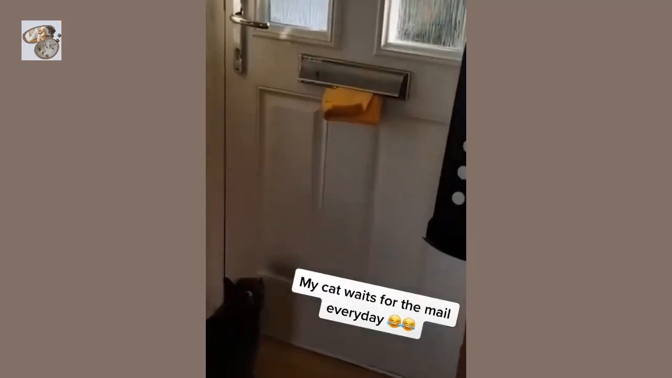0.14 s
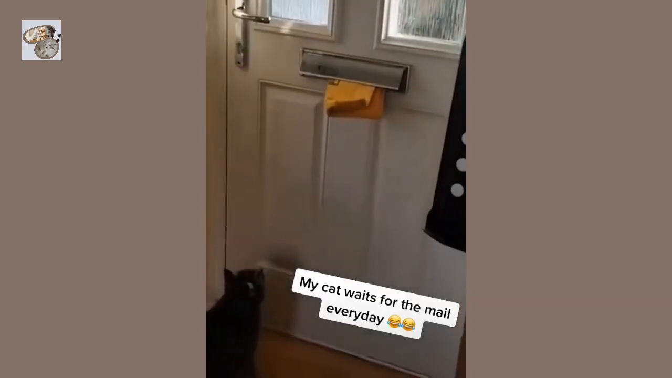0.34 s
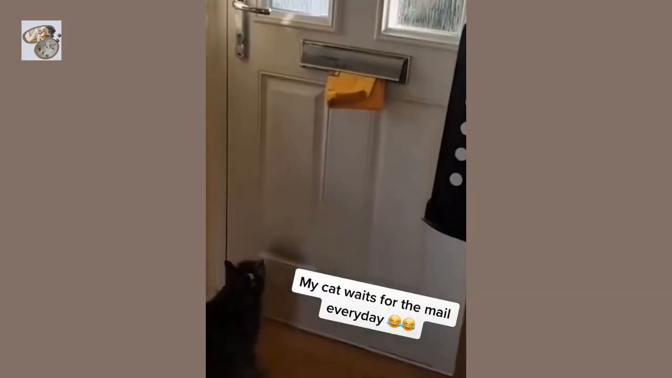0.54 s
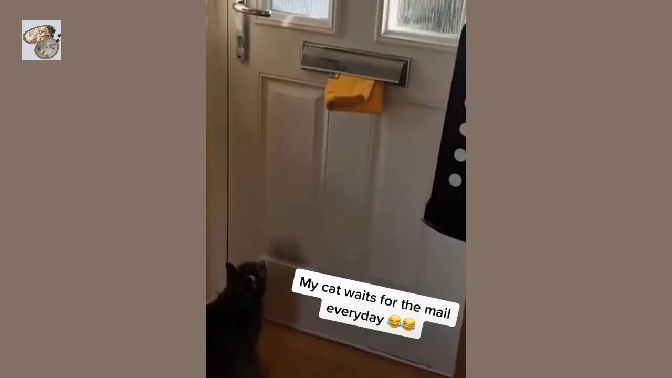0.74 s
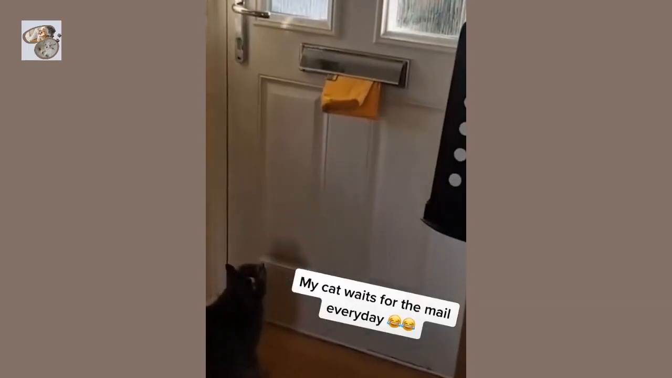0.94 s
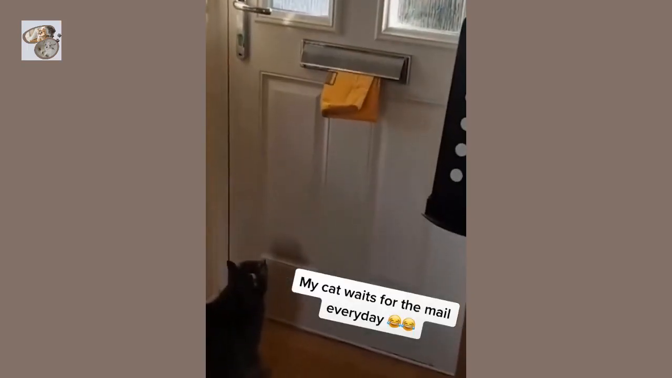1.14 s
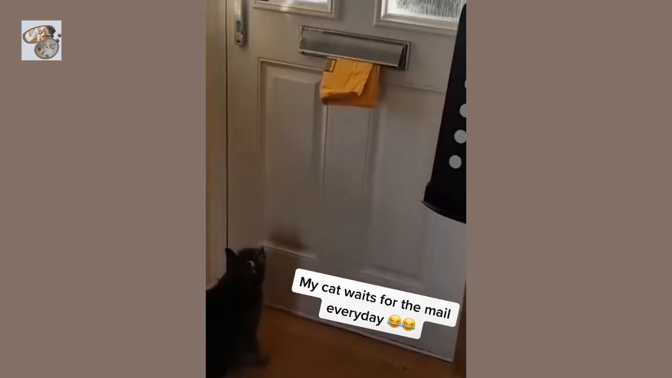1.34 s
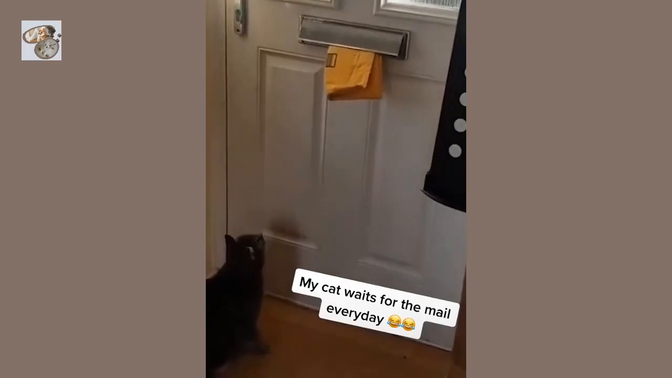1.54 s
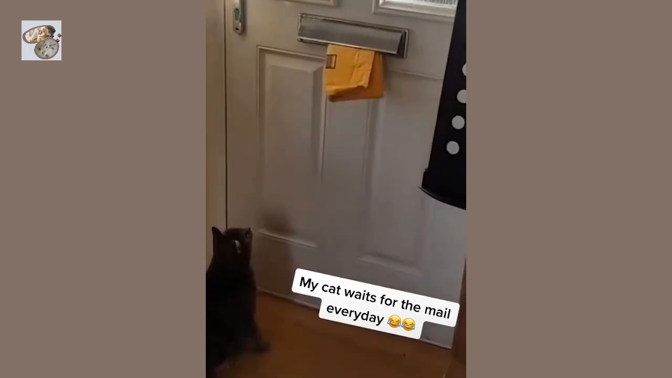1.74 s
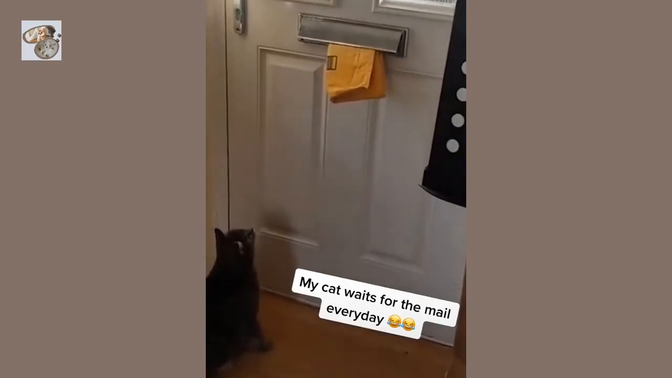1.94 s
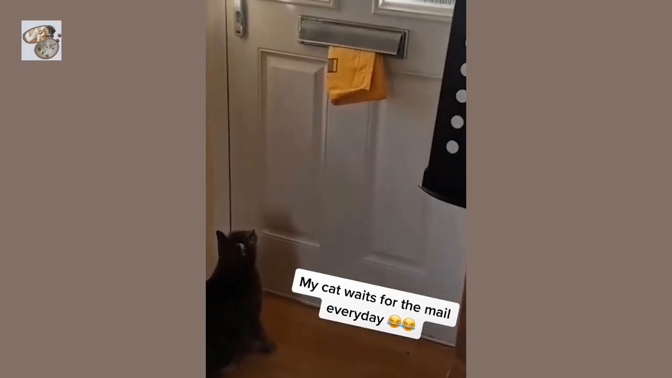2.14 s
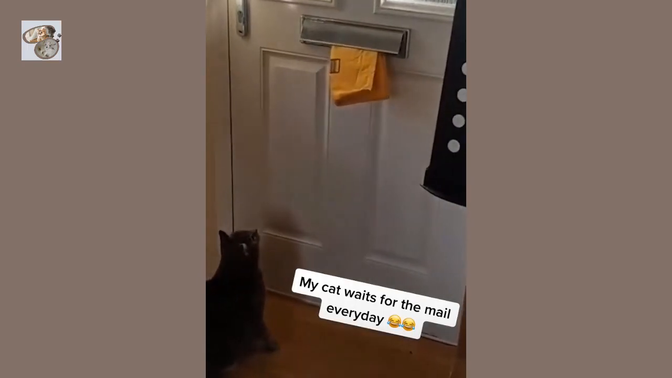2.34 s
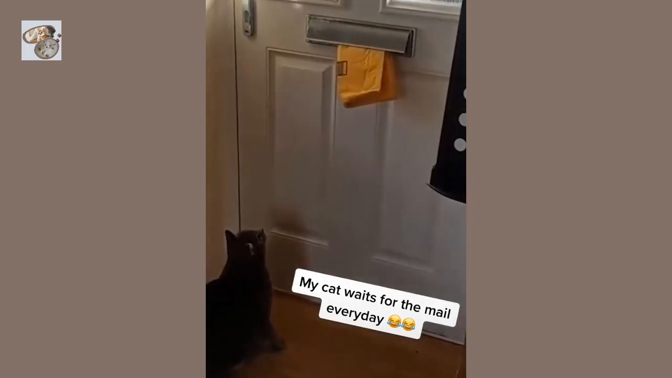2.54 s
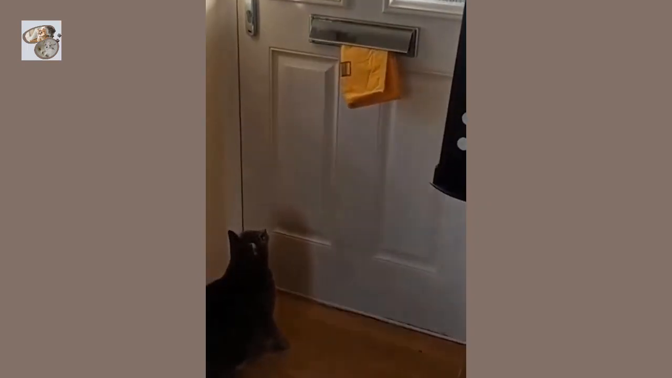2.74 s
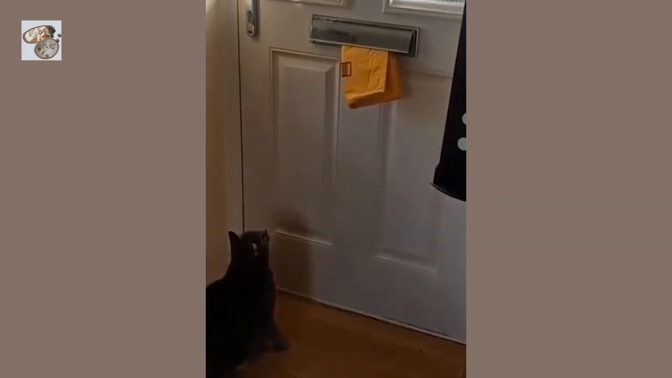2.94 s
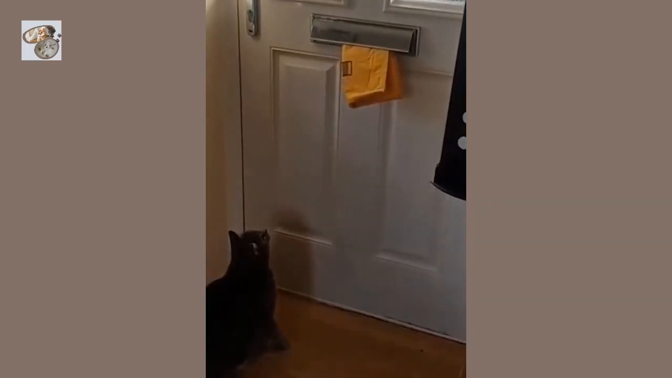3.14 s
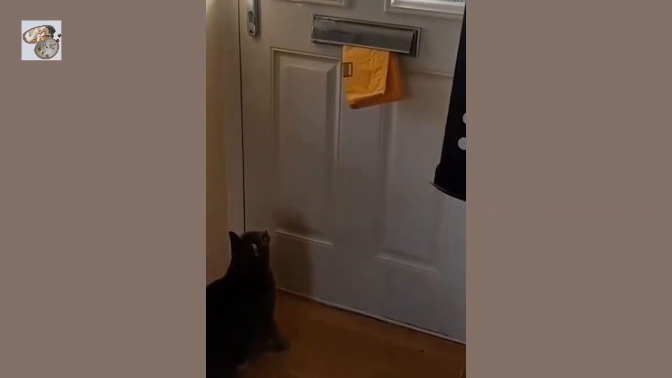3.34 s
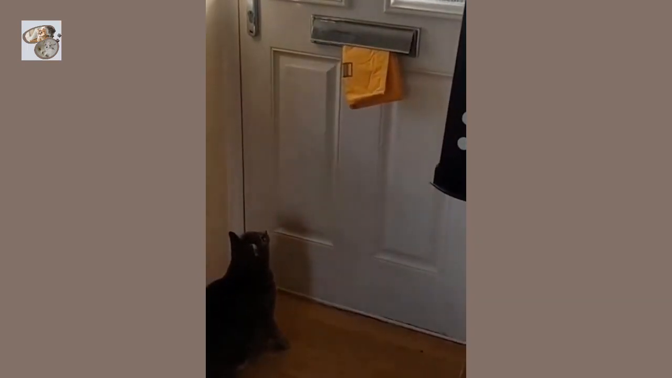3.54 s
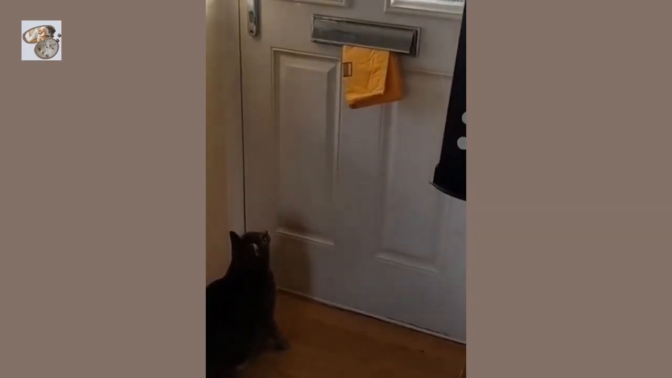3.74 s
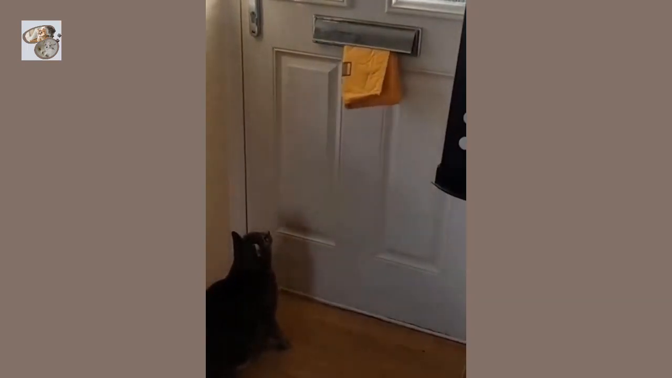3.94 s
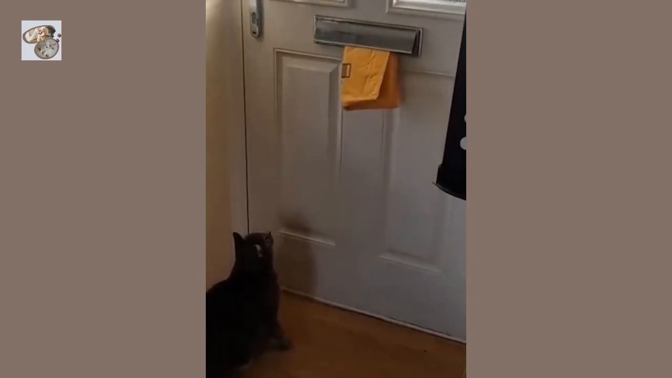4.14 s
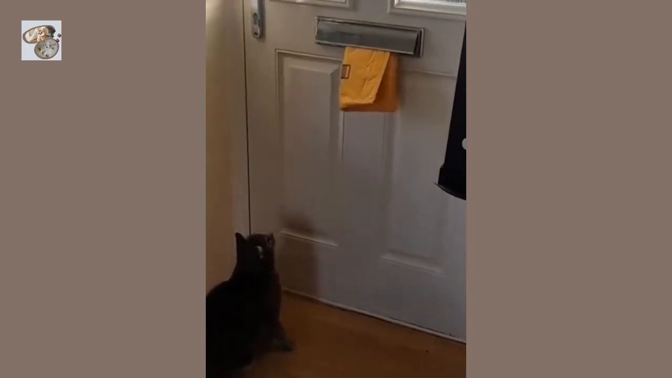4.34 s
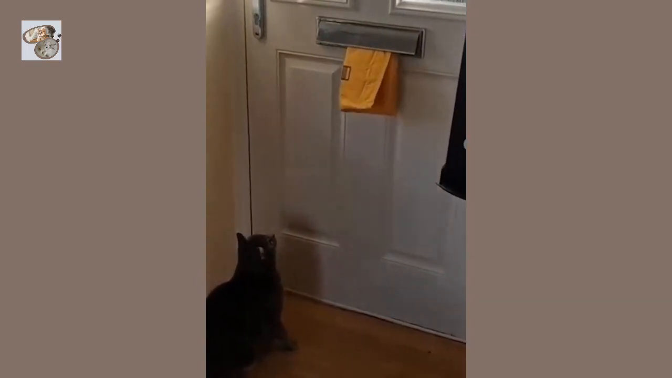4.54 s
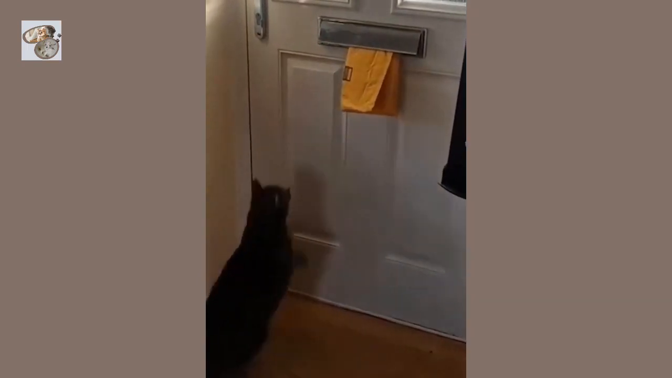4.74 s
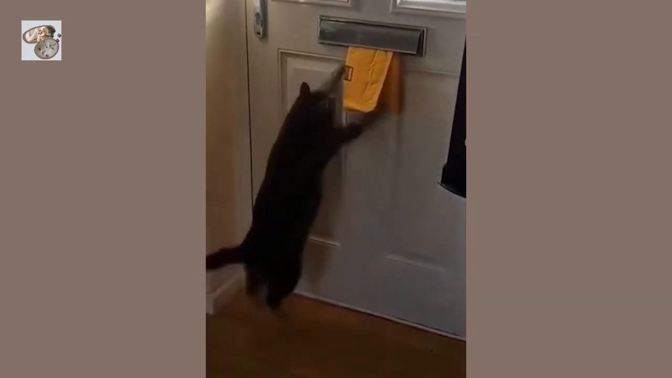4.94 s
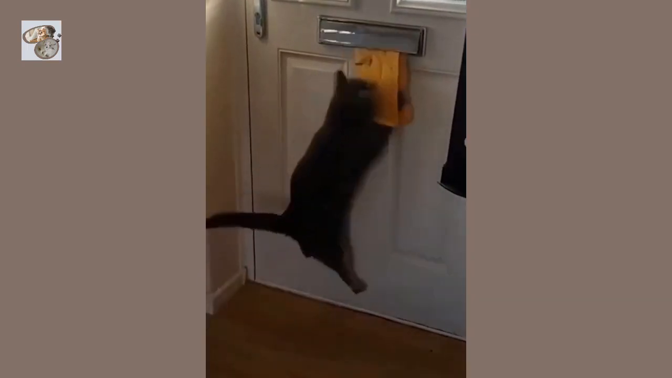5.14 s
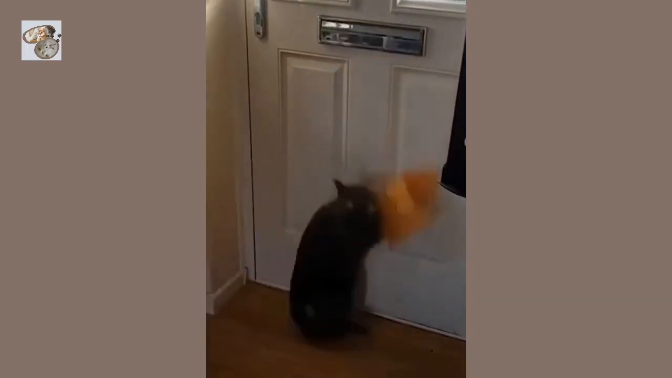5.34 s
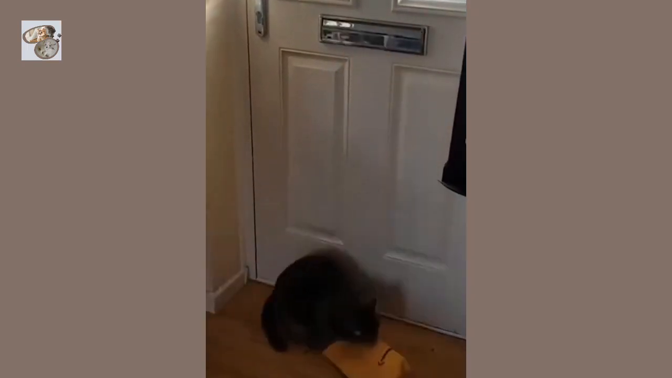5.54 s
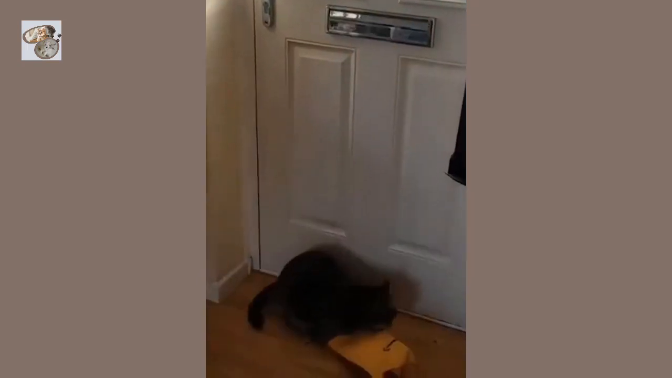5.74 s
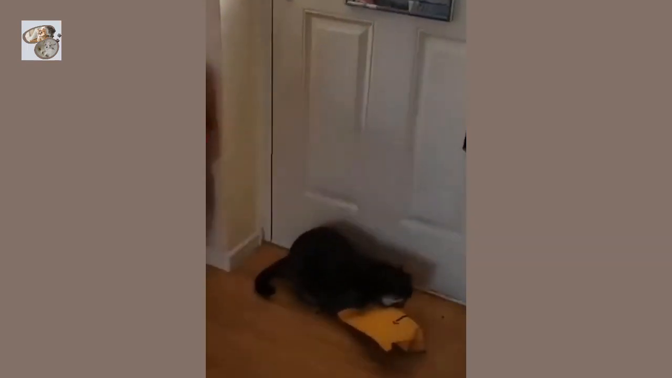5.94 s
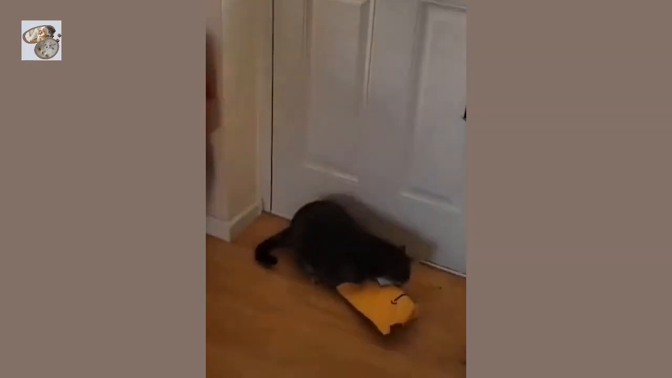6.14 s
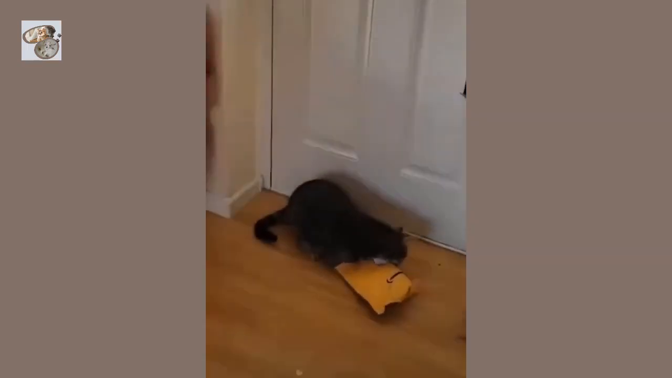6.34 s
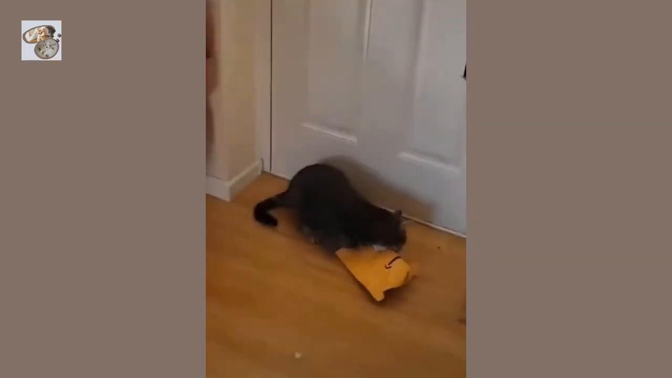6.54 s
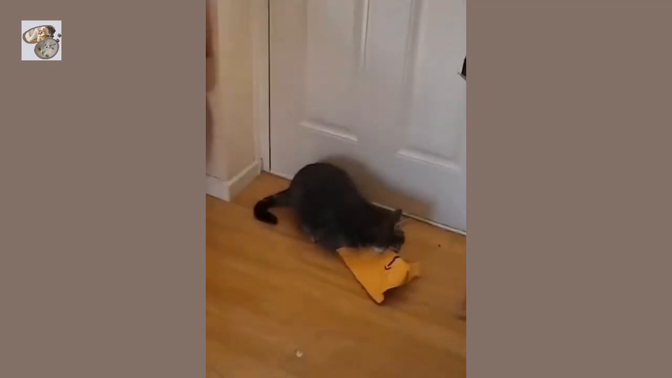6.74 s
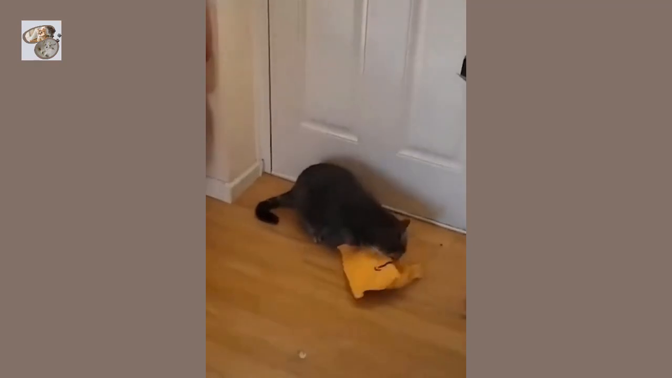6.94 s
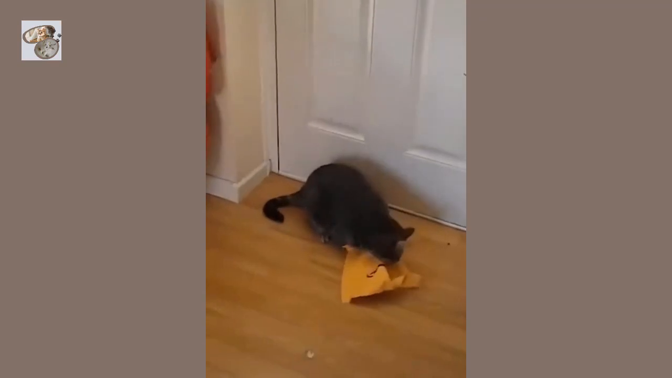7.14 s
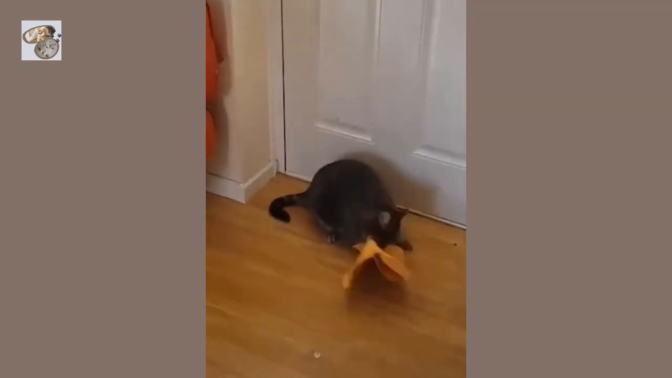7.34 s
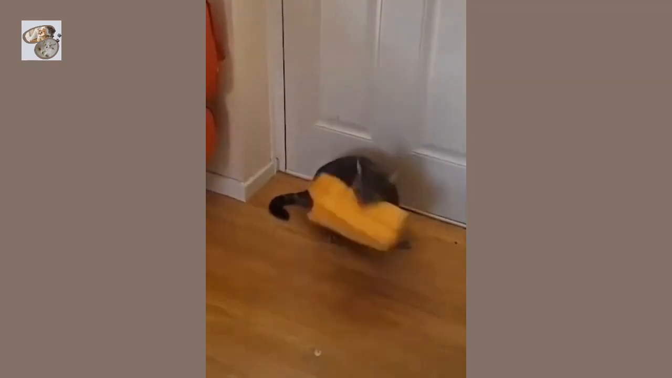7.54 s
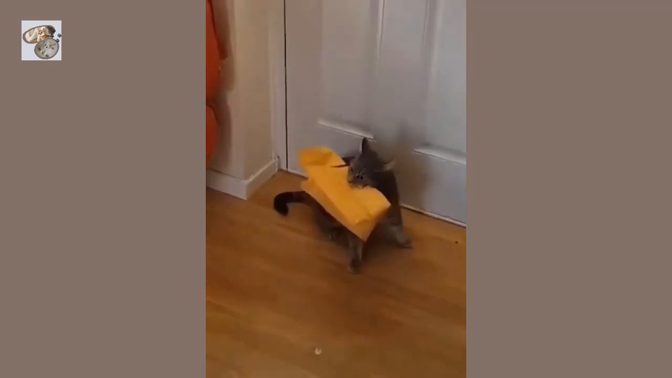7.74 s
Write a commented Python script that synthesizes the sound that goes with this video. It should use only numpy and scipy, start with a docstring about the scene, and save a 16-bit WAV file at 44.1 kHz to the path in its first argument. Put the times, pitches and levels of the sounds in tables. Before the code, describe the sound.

Close in a small hard-floored hall, a padded envelope is pushed through a metal letterbox with soft rustles, a sharp early knock and scattered snaps, while an engine drones low outside. The rubbing thins to near quiet, then a cat rips the envelope free, the flap clacks, and both hit the floor with loud thumps. Crisp paper crackles and small paw taps follow, ending in a sharp snap.

```python
"""A hard-floored hall, close to the front door. First traffic drones faintly behind the door and a second hum
passes, while a padded envelope is worked through the metal letterbox: rustling strokes, snaps and knocks.
Then a cat leaps, drags the envelope out and lands with it; lastly it paws and bites it on the floor.
Rumble and rustle are filtered noise, engines are wavering sines, snaps are noise and a short ring,
thumps ring the modes of the boards, and the hall is a tail of sparse taps."""
import sys
import numpy as np
from scipy import signal
from scipy.fft import rfft, irfft, next_fast_len
from scipy.io import wavfile
from scipy.ndimage import uniform_filter1d

SR = 44100
rng = np.random.default_rng(int(sys.argv[2]) if len(sys.argv) > 2 else 0)


def wav_record(signal):
    """Record a signal, one row per channel, as 16-bit PCM in the file named by sys.argv[1]."""
    frames = np.transpose(np.atleast_2d(signal))
    bounded = np.clip(frames, -1, 1)
    # unit amplitude maps onto the largest positive 16-bit level
    quanta = np.round(bounded * 32767).astype(np.int16)
    wavfile.write(sys.argv[1], SR, quanta)


N = 344421


def gain_of(db):
    """Turns dB into an amplitude factor."""
    return 10 ** (np.asarray(db) / 20)


def evened(x):
    """Scales each channel to an RMS of 1."""
    return x / np.sqrt(np.mean(x ** 2, axis=-1, keepdims=True) + 1e-20)


def read(points, hz):
    """Reads a curve over frequency, straight on a log axis between its points."""
    f, value = np.transpose(points)
    return np.interp(np.log(hz + 1), np.log(f + 1), value)


def follow(rows):
    """Every column of a timed table, sample by sample; the ends are held."""
    s, *columns = np.transpose(rows)
    return [np.interp(np.arange(N) / SR, s, c) for c in columns]


def colour(x, points):
    """Filters a sound by a spectrum in dB."""
    size = next_fast_len(N)
    gain = gain_of(read(points, np.fft.rfftfreq(size, 1 / SR)))
    return irfft(rfft(x, size) * gain, size)[..., :N]


def add(mix, s, sound):
    """Lays a sound into the mix at s seconds, cut at the end."""
    part = mix[round(s * SR):][:len(sound)]
    part += sound[:len(part)]


# rumble of street and house: time_s, level_db
RUMBLE_LEVEL = [(0.0, -58), (1.5, -62), (2.1, -63), (2.9, -66), (3.8, -64), (5.0, -68.5), (5.4, -60),
                (6.15, -61), (6.4, -68), (6.7, -63.5), (7.81, -59)]
# relative spectrum of that rumble: freq_hz, density_db (per Hz)
RUMBLE_SPECTRUM = [(12, -54), (20, -21), (32, 6), (50, -5.5), (65, 3.5), (102, -1.5), (151, -6),
                   (182, -10.5), (500, -22), (650, -76), (1100, -120)]


def background():
    """Low rumble of street and house: coloured stereo noise that swells and sinks."""
    level = gain_of(follow(RUMBLE_LEVEL)[0])
    noise = rng.standard_normal((2, N))
    return level * evened(colour(noise, RUMBLE_SPECTRUM))


# an engine outside the door: time_s, firing_hz, level_db, octave_level_db
ENGINE_OUTSIDE = [(0.0, 75, -69, -58.5), (0.3, 77.9, -73, -66), (0.75, 81.5, -65, -74),
                  (0.95, 80.8, -61, -80), (1.1, 83, -55, -67), (1.28, 86, -61, -51), (1.45, 87, -66.5, -53),
                  (1.52, 87.5, -70, -61), (1.6, 88, -65, -50.5), (1.72, 88.6, -67, -58.5),
                  (1.84, 89.5, -65.5, -72), (2.15, 91.05, -74, -73.5), (2.3, 89, -73, -63.5),
                  (2.6, 79, -64.5, -76), (2.95, 66.5, -64, -64), (3.3, 64.5, -65, -78.5),
                  (3.75, 68.5, -70, -70), (3.92, 69.4, -66, -67.5), (4.15, 72.2, -57.5, -64.5),
                  (4.3, 74.7, -65, -82), (4.72, 75.8, -68, -74), (5.3, 77.8, -78, -68)]
# a second, passing hum: time_s, pitch_hz, level_db
PASSING_HUM = [(0.3, 105.5, -71), (0.6, 106.3, -58.5), (0.85, 98, -75)]


def drone(rows):
    """Slightly unsteady harmonics that fade over 0.11 s beyond the first and last row of their table."""
    hz, *levels = follow(rows)
    waver = evened(uniform_filter1d(rng.standard_normal(N), size=2000))
    t = np.arange(N) / SR
    inside = np.minimum(rows[-1][0] - t, t - rows[0][0])
    fade = np.clip(inside / 0.11 + 1, 0, 1)
    turns = np.cumsum(hz * (1 + 0.0093 * waver)) / SR
    harmonics = sum(gain_of(db) * np.sin(2 * np.pi * k * turns) for k, db in enumerate(levels, 1))
    return np.sqrt(2) * fade * harmonics  # levels are RMS


# how long the hall rings: freq_hz, t60_s
HALL_DECAY = [(100, 0.28), (400, 0.37), (1500, 0.49), (4000, 0.14), (9000, 0.32)]


def hall(x):
    """Two unrelated tails of sparse taps, one for mid and one for side; each pitch dies at its own rate."""
    taps = np.zeros((2, SR // 2))
    at = np.arange(100, SR // 2 - 20, 20) + rng.integers(0, 20, (2, (SR // 2 - 101) // 20))
    np.put_along_axis(taps, at, rng.choice([-1., 1.], at.shape), 1)
    hz, t, z = signal.stft(taps, SR, nperseg=512)
    decay = gain_of(-60 * t / read(HALL_DECAY, hz)[:, None])
    tail = signal.istft(z * decay, SR, nperseg=512)[1]
    tail = tail / np.linalg.norm(tail[0])
    return signal.fftconvolve(x[None], tail, axes=1)[:, :N]


# door and floor boards: mode_hz, level_db (before the blow favours some modes), t60_s (times ring_factor)
BOARD_MODES = [(70.6, -10, 0.17), (91, -2.5, 0.09), (155.7, -1.5, 0.2), (207.5, 6.5, 0.099),
               (273.4, -0.5, 0.11), (337, -6.5, 0.4), (473, -4, 0.24), (610, -42, 0.326), (766, 3, 0.33)]
# paws, body and parcel striking door and floor:
# start_s, peak_db, blow_hz (pitch best driven), ring_factor (on the t60 of the boards)
BLOWS = [(.131, -29.5, 141, 0.4), (.168, -36, 171, 0.86), (3.544, -48, 412, 0.44), (3.831, -49, 375, 0.37),
         (5.396, -33, 78, 0.65), (5.432, -24, 202, 0.81), (5.454, -19, 73, 0.32), (5.501, -30, 70.4, 0.82),
         (5.54, -29, 65, 1.1), (5.584, -16, 130, 0.65), (5.6, -7.5, 207, 0.62), (5.612, -14.5, 70, 1.05),
         (5.619, -10.5, 203, 0.61), (5.643, -17, 146, 0.99), (5.691, -14, 100, 0.29),
         (5.736, -28.5, 65, 0.32), (5.78, -36, 60, 1.2), (5.853, -23.5, 280, 0.29), (5.888, -19, 400, 0.15),
         (6.32, -45, 510, 0.41), (6.444, -50, 550, 0.13), (6.51, -41.5, 460, 0.43),
         (6.68, -46.5, 210, 0.46), (6.74, -48, 188, 0.72), (6.79, -50, 215, 0.94), (6.837, -36, 267, 0.27),
         (6.993, -43, 187, 0.62), (7.041, -30, 310, 0.31), (7.569, -44.5, 157, 0.55),
         (7.652, -39.5, 304, 1.1), (7.775, -40.5, 162, 0.55)]


def thumps():
    """Each blow rings the boards; its size and place favour the modes near one pitch."""
    t, out = np.arange(SR // 2) / SR, np.zeros(N)
    for s, peak_db, blow_hz, ring_factor in BLOWS:
        sound = 0
        for hz, level_db, t60 in BOARD_MODES:
            driven_db = level_db - 14.5 * np.log2(hz / blow_hz) ** 2
            sound = sound + gain_of(driven_db - 60 * t / (t60 * ring_factor)) * np.sin(2 * np.pi * hz * t)
        sound *= 1 - np.exp(-t * blow_hz / 0.76)  # the push takes part of a cycle to build
        add(out, s, gain_of(peak_db) * sound / abs(sound).max())
    return out


# spectrum of the paper, for its snaps and its rustle: freq_hz, density_db (per Hz)
PAPER_SPECTRUM = [(150, -1.5), (250, -6.5), (394, -12.5), (841, -3), (1010, -2.5), (1260, -5.5), (1760, -2),
                  (4450, -2.5), (6450, -10.5), (8310, -21), (12200, -12.5), (13100, -24), (14000, -83)]
# snaps of the paper and knocks of the flap: start_s, level_db, pitch_hz, ring_share (0-1),
# decay_s (60 dB fall of the noise), hall_db (send to the hall, before a common cut)
SNAP_EVENTS = [(.13, -20.5, 2060, 0.78, 0.027, 2), (0.132, -24, 900, 0, 0.034, -2),
               (1.27, -29, 3280, 0.22, 0.033, 14.5), (1.445, -32, 2580, 0.24, 0.11, 18.5),
               (2.332, -24.5, 900, 0.43, 0.031, 6.5), (2.883, -32, 2950, 1, 0.026, 6),
               (2.888, -33, 2960, 0.68, 0.045, -2), (3.476, -41, 890, 0.8, 0.015, -2),
               (3.533, -30.5, 772, 0.24, 0.042, 1), (3.714, -37, 2647, 0.88, 0.012, -8),
               (3.827, -29, 1163, 0.57, 0.062, -5), (5.323, -28.5, 5300, 0.31, 0.071, 22.5),
               (5.336, -26, 921, 0.56, 0.032, 11.5), (5.389, -17, 840, 0.77, .06, 5),
               (5.591, -13, 6200, 0.08, 0.035, 14), (5.602, -10, 8850, 0.08, 0.052, 9.5),
               (5.6, -13.5, 760, 0.23, 0.067, 5), (5.883, -15, 3900, 0, 0.17, -15),
               (5.889, -8.5, 2680, 0.45, 0.018, -20), (6.322, -30, 658, 0.68, 0.08, 0),
               (6.352, -26.5, 2980, 0.36, 0.088, 4), (6.441, -27, 4100, 0.24, .03, -3),
               (6.51, -18, 1340, 0.3, 0.013, 7.5), (6.633, -24.5, 5100, 0.13, 0.0084, 5),
               (6.657, -29, 5000, 0.3, .005, -7), (6.763, -25.5, 7200, 0.04, 0.011, -11.5),
               (6.834, -22.5, 750, 0.44, 0.024, 6), (6.992, -23, 1920, 0.38, 0.016, 11.5),
               (7.039, -22.5, 1580, 0.1, 0.039, 4), (7.654, -9, 3130, 0.33, 0.028, 3),
               (7.655, -19.5, 1296, 0.6, 0.047, -4), (7.78, -24.5, 1880, 0.26, 0.071, 2)]


def snaps():
    """A crack of noise around one pitch plus a short ring there; near ones are dry, far ones fill the hall."""
    near, far, t = np.zeros(N), np.zeros(N), np.arange(SR // 8) / SR
    paper = colour(rng.standard_normal(N + SR)[:N], PAPER_SPECTRUM)
    for s, db, hz, ring_share, decay_s, hall_db in SNAP_EVENTS:
        edges = np.clip([hz / 1.12, hz * 2.26], 50, 15000)
        piece = np.resize(paper[round(s * SR):], len(t))
        noise = signal.lfilter(*signal.butter(1, edges, "band", fs=SR), piece)
        ring_share = np.clip(ring_share, 0, 1)
        attack = 1 - np.exp(-t / (0.027 * decay_s))
        shape = gain_of(db - 60 * t / max(decay_s, .002)) * attack
        ring = np.sin(2 * np.pi * hz * t) * gain_of(-40 * t / decay_s)  # dies faster than the noise
        sound = shape * (ring_share * ring + (1 - ring_share) * 0.37 * evened(noise))
        add(near, s, sound)
        add(far, s, gain_of(hall_db) * sound)
    return near, far


def sticking(db, hold=0.019):
    """Paper sticks before it snaps: the rubbing cannot grow in the last moments (hold, in s)."""
    db = db.copy()
    for s, *_ in SNAP_EVENTS:
        before = slice(round((s - hold) * SR), round(s * SR))
        db[before] = np.minimum(db[before], db[before.start])
    return db


def lifted(peaks):
    """The paper's spectrum raised or lowered at the resonances of what it rubs on."""
    hz = np.geomspace(100, 15000, num=1500)
    lift = sum((gain_of(db) - 1) / (1 + (2 * (hz - f) / width) ** 2) for f, width, db in peaks)
    return np.transpose([hz, read(PAPER_SPECTRUM, hz) + 20 * np.log10(np.maximum(1 + lift, .1))])


# strokes of the rubbing envelope: full_s (time of full level), held_s, rustle_db,
# swell_s (time to swell by 20 dB, at least 5 ms), then relative to rustle_db:
# drag_db (low drag), hollow_db (hollow of the bag), fizz_db
STROKE_EVENTS = [(0.02, 0.13, -52, 3, -4.5, -18, -10), (0.13, 0.0077, -45, 0.05, -0.5, -3.5, -23),
                 (0.4, 0.11, -52, 0.26, -6, -6, -15.5), (0.58, .1, -52, 0.15, -6.5, -9, -12),
                 (0.8, 0.19, -63.5, 3.2, -14, -18, -12.5), (1.11, 0.048, -56, 0.13, -3.5, -9.5, -16),
                 (1.27, 0.037, -49, 0.12, -12.5, -13, -7.5), (1.456, 0.059, -45, 0.1251, -9.5, -8.5, -13.5),
                 (1.6, .04, -58.5, 0.07, -1, -4.5, -15), (1.87, .14, -52.5, .11, -14.5, -7, -14),
                 (2.23, 0.061, -53, 0.12, -28, -4, -12), (2.335, 0.013, -47, 0.05, -16, -12, -21),
                 (2.458, 0.022, -55.5, -0.26, -7.5, -6, -21), (2.75, .06, -57.5, .11, -14.5, -7.5, -13),
                 (2.885, 0.033, -56, 0.16, -27.5, -16.5, -16), (3.08, 0.045, -60.5, 0.2, -12.5, -10, -20),
                 (3.2, 0.063, -68.5, 1.8, -9, -8.5, -10), (3.47, 0.072, -62.5, 0.14, -0.5, 1, -18),
                 (3.544, 0.011, -55.5, -0.05, -1, -18, -37), (3.72, 0.012, -61.5, 0.35, -2.5, -17, -22),
                 (3.839, 0.0084, -58, 0.06, -4.5, 2, -20), (4.18, 0.11, -57.5, .08, -18, -4.5, -14.5),
                 (4.459, 0.028, -58, .12, -32, -4.5, -11.5), (4.56, .05, -58, 0.22, -20, -10, -13),
                 (4.73, 0.09, -54, 0.11, -17.5, -7, -11), (4.9, .04, -62, 0.1, -8, -21, -10),
                 (5.019, 0.01, -55, .12, -13, -13.5, -11), (5.15, 0.16, -65, 0.7, -27, -18, -9),
                 (5.373, 0.029, -29, 0.0247, -12, -5, -6.5), (5.45, 0.04, -31.5, 0.06, -9, -6.5, -25),
                 (5.54, .04, -41.5, 0.0324, -3.5, -8, -12), (5.596, 0.035, -29.5, 0.05, 2, 1.5, -5),
                 (5.799, 0.035, -46, 0.02, -12, -21, -13), (5.89, 0.023, -28, -0.0242, -3.5, -16, -16.5),
                 (6.0, 0.0072, -41.5, 0.02, -7.5, -4.5, -36), (6.218, 0.0039, -57, 0.5, -8.5, -13, -13.5),
                 (6.35, 0.053, -45.5, 0.07, -23, -11.5, -17), (6.45, 0.015, -51, -0.03, -7, -5, -6.5),
                 (6.52, 0.013, -47, .1, -11, 0, -16), (6.631, 0.084, -52.5, 0, -11.5, -5.5, -14),
                 (6.75, 0.014, -56.5, -0.24, -8, -13, -7), (6.843, 0.03, -53, 0.06, 2, -6, -15),
                 (6.98, 0.04, -49, .12, -23, -13, -26), (7.044, 0.0046, -42, .12, -4, -7, -21),
                 (7.24, 0.23, -51.5, 0.17, -24, -18, -11), (7.4, 0.029, -42.5, 0.06, -8.5, -3, -14),
                 (7.499, 0.014, -42.5, .1, -30, -14, -10.5), (7.58, 0.032, -50, .1, -17, -19, -14),
                 (7.657, 0.0038, -36, 0.05, -12.5, -5, -25), (7.74, 0.032, -47.5, 0.5, -25, -12, -12),
                 (7.79, .03, -43, -0.01, -13, -9, -7)]
# faint hiss between strokes: one level_db each for the drag, hollow, rustle and fizz bands
REST_LEVELS = [-81.5, -95.5, -89.5, -81]
FADE_DB_PER_S = 153.5  # every stroke dies away alike


def strokes():
    """Level in dB of the four bands: each stroke swells, holds and fades, and their powers add."""
    t = np.arange(0, N, 64) / SR
    power = gain_of(REST_LEVELS)[:, None] ** 2 + 0 * t
    for s, held, rustle_db, swell, drag_db, hollow_db, fizz_db in STROKE_EVENTS:
        swell_db = -20 * np.maximum(s - t, 0) / max(swell, .005)
        fade_db = -FADE_DB_PER_S * np.maximum(t - s - held, 0)
        band_db = np.array([[drag_db], [hollow_db], [0], [fizz_db]])
        power = power + gain_of(rustle_db + swell_db + fade_db + band_db) ** 2
    return [np.interp(np.arange(N) / SR, t, 10 * np.log10(p)) for p in power]


# resonances of the metal flap: freq_hz, width_hz, lift_db
FLAP_MODES = [(824, 110, 5.5), (1210, 90, 8), (2280, 145, 4), (2870, 280, 2), (3960, 33, -12),
              (4650, 13, -1.5)]
# resonances of the floor under the envelope: freq_hz, width_hz, lift_db
FLOOR_MODES = [(303, 82, 3.5), (445, 15.5, 9.5), (640, 9.7, -2.5)]
FREE_S = 5.55  # the envelope has left the slot


def rustle(crackle_db=1.2, patchy_db=3.6):
    """Slips of paper as noise with unsteady loudness, their spectrum randomly uneven."""
    density = uniform_filter1d(rng.exponential(1, N) ** 3, size=300) - 6  # 6 is the mean
    slips = rng.standard_normal((2, N)) * gain_of(crackle_db * evened(density))
    in_slot = np.arange(N) < FREE_S * SR
    rubbed = colour(slips * in_slot, lifted(FLAP_MODES)) + colour(slips * ~in_slot, lifted(FLOOR_MODES))

    # random patches of time and pitch are raised or lowered
    hz, t, z = signal.stft(rubbed, SR, nperseg=512, noverlap=384)
    patches = rng.standard_normal((len(t), len(hz))).T
    patches = uniform_filter1d(patches, size=14, axis=1)
    z = z * gain_of(patchy_db * patches / patches.std())

    # power shares of the drag, hollow, rustle and fizz bands; nothing rustles under the first edge
    under = [1 / (1 + (hz / edge_hz) ** 12) for edge_hz in (200, 600, 1400, 6500)]
    shares = np.diff([*under, 1 + 0 * hz], axis=0).clip(0)
    out = 0
    for share, db in zip(shares, strokes()):
        band = signal.istft(z * np.sqrt(share)[:, None], SR, nperseg=512, noverlap=384)[1][:, :N]
        out = out + evened(band) * gain_of(sticking(db))
    return out


# stereo width, a filter on the side signal: freq_hz, gain_db
SIDE_WIDTH = [(40, -16), (130, -10), (250, -9), (500, -7.5), (1100, -1), (2300, -2), (4200, -3), (7600, -1),
              (12000, -1.5)]
LEAN_DB = -1.5  # the envelope is heard a little to the right; set before the width filter


def scene():
    """Mixes the close sounds, the hall behind them and the street as mid and side, then left and right."""
    near, far = snaps()
    blows, paper = thumps(), rustle()
    wide = paper + background()
    wide = wide + hall(gain_of(-8.5) * far)
    mid, side = wide + gain_of([[-10], [-20]]) * hall(blows)
    lean = np.tanh(LEAN_DB * np.log(10) / 20)
    side = colour(side + 0.13 * near + lean * paper[0], SIDE_WIDTH)
    mid = mid + near + blows + drone(ENGINE_OUTSIDE) + drone(PASSING_HUM)
    return np.array([mid + side, mid - side])


EDGE_HZ = 13500  # upper band limit


def record(dry):
    """The microphone drops the deepest bass under 42 Hz; then the band limit cuts the top."""
    dry = signal.lfilter(*signal.butter(2, 42, "high", fs=SR), dry)
    low_pass = signal.firwin(511, EDGE_HZ, window=("kaiser", 9), fs=SR)
    return signal.oaconvolve(dry, low_pass[None], "same")


dry = scene()
out = record(dry)
wav_record(out)
```